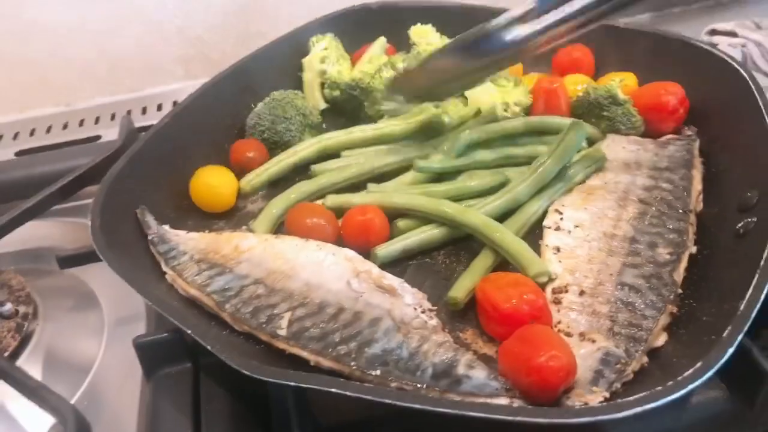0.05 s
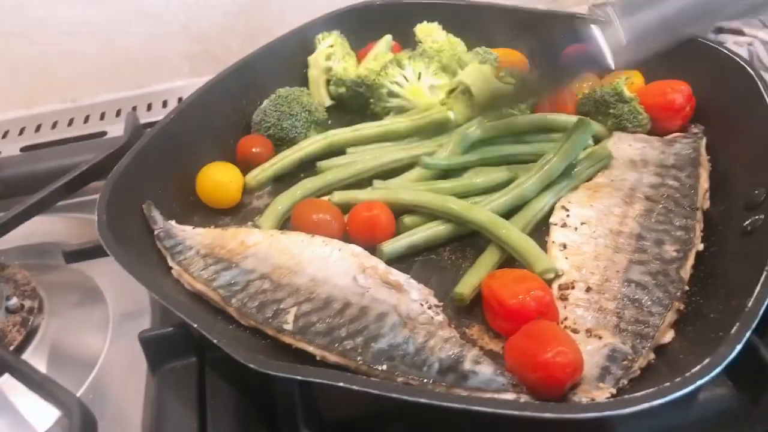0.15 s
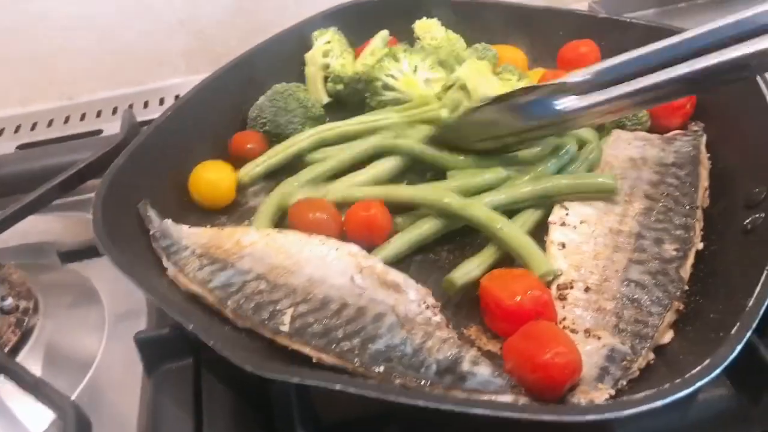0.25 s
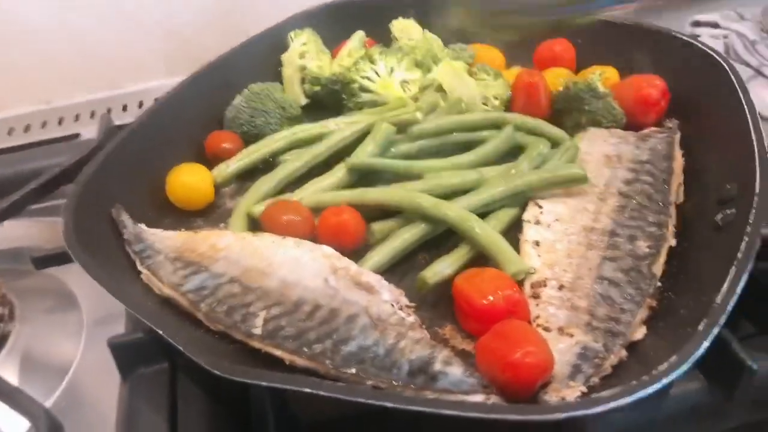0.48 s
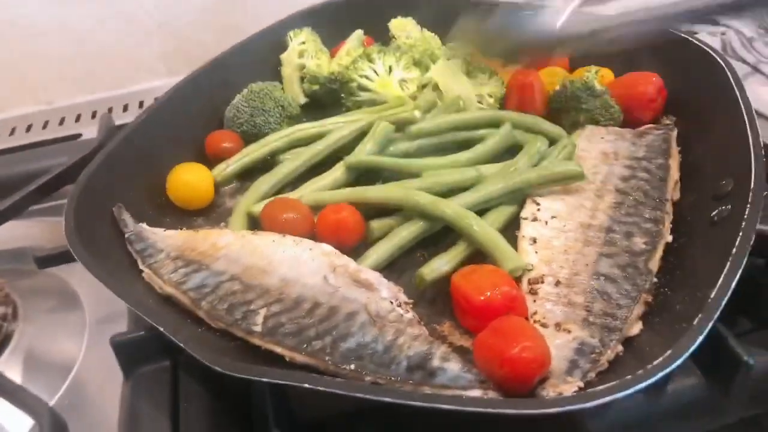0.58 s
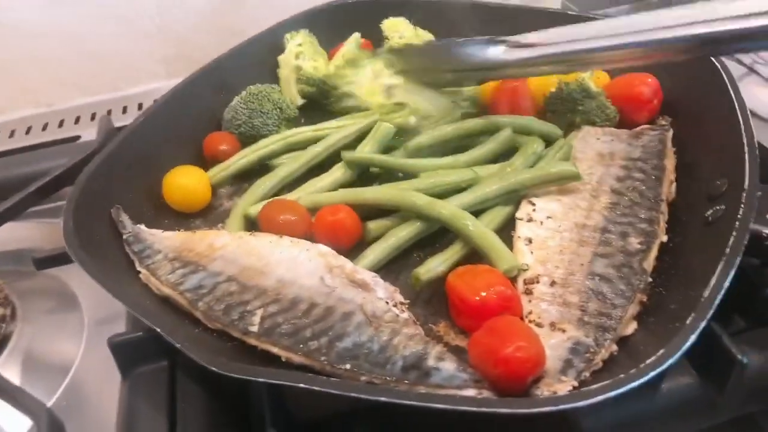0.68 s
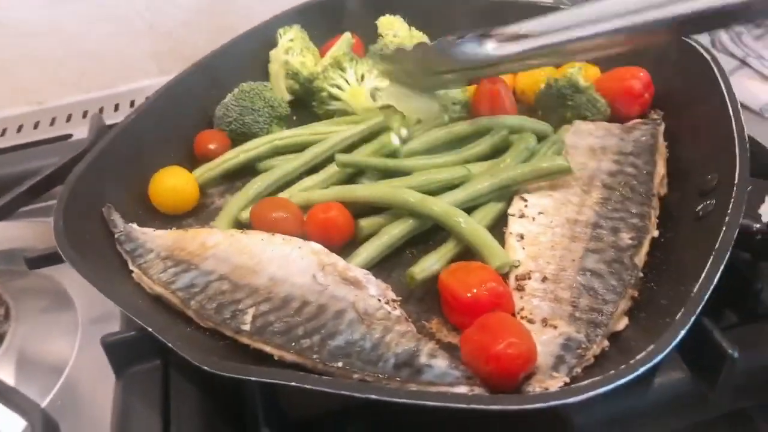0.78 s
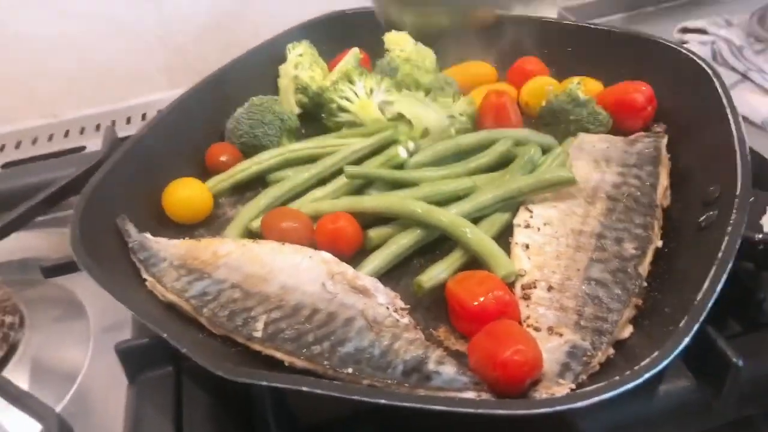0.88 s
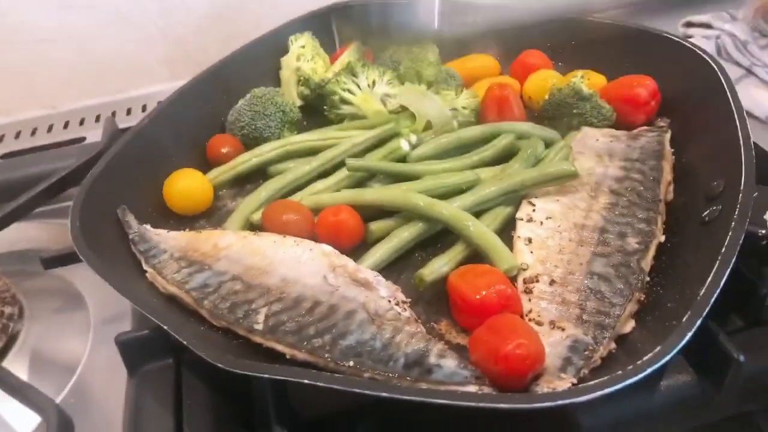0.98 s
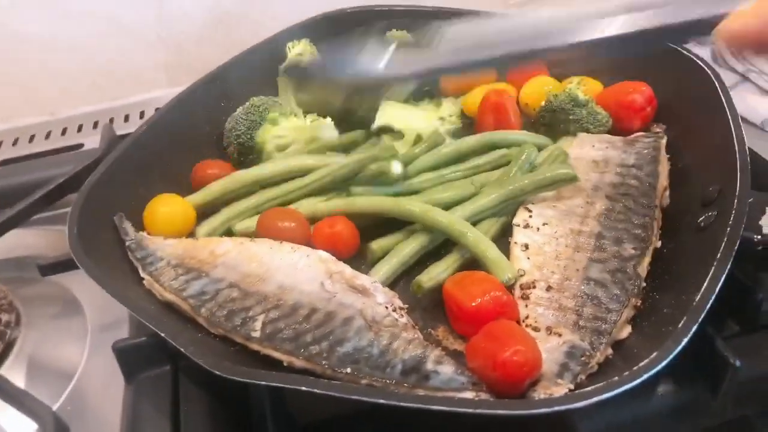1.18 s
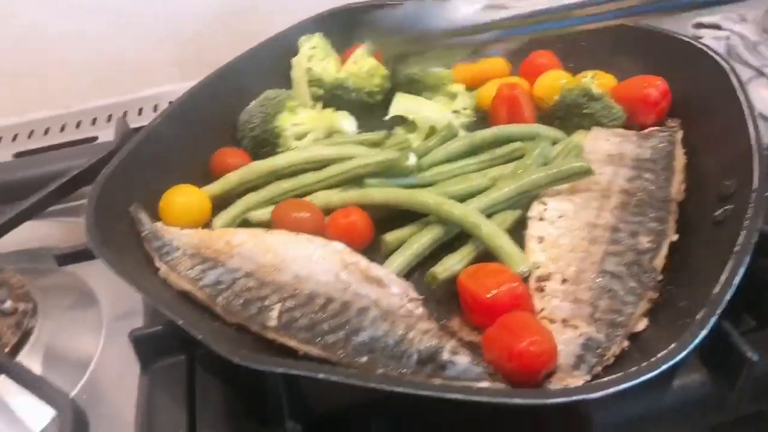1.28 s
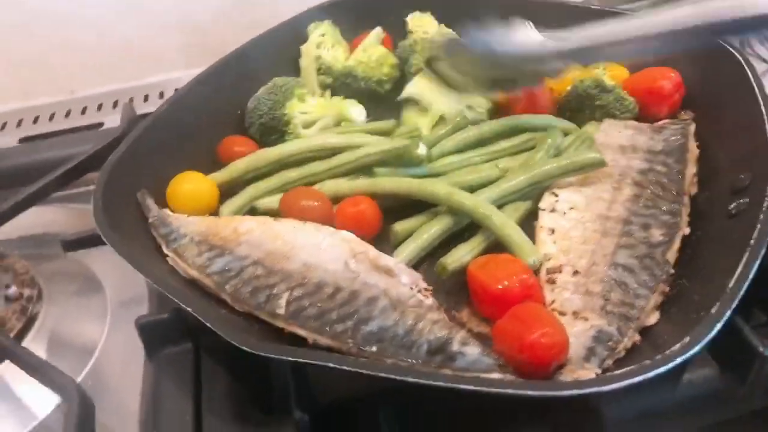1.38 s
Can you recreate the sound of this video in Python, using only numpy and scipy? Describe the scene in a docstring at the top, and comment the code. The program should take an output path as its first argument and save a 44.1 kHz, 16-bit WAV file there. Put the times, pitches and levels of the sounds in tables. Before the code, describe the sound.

One sharp clack of steel tongs on a pan, with food sizzling softly underneath.

```python
"""Tongs on a frying pan

Fat sizzles softly over a gas flame while the pan rocks on its grate with dull thuds.
Steel tongs graze, then clack hard on the coated pan: the impacts excite its damped modes,
and the kitchen reverberates. Small scrapes and spits tick; at the end the tongs' arms clink."""
import sys
import numpy as np
from scipy import signal
from scipy.fft import rfft, irfft
from scipy.io import wavfile
from scipy.ndimage import uniform_filter1d

SR = 44100
rng = np.random.default_rng(int(sys.argv[2]) if len(sys.argv) > 2 else 0)


def wav_record(signal):
    """Record a signal, one row per channel, as 16-bit PCM in the file named by sys.argv[1]."""
    frames = np.transpose(np.atleast_2d(signal))
    bounded = np.clip(frames, -1, 1)
    # unit amplitude maps onto the largest positive 16-bit level
    quanta = np.round(bounded * 32767).astype(np.int16)
    wavfile.write(sys.argv[1], SR, quanta)


N = 63945
T = np.arange(N) / SR
BANDS_HZ = 30 * 2 ** np.arange(0, 9.6, .5)  # half-octave centres


def undb(db):
    """Amplitude ratio of a level in decibels."""
    return 10 ** (np.asarray(db) / 20)


def unit(x):
    """Normalisation to an rms of 1."""
    return x / np.sqrt(np.mean(x ** 2))


def value_at(table, hz):
    """Interpolation of (frequency, value) rows on a logarithmic frequency axis."""
    freqs, values = np.array(table).T
    return np.interp(np.log(hz), np.log(freqs), values)


def convolve(drive, response):
    """A linear system's output: the drive convolved with its impulse response."""
    return signal.fftconvolve(drive, response)[:N]


def noise_band(hz, octaves):
    """White noise through a cosine passband that reaches zero `octaves` either side of hz."""
    freqs = np.maximum(np.fft.rfftfreq(N, 1 / SR), 1)
    shape = np.cos(np.pi / 2 * np.clip(np.log2(freqs / hz) / octaves, -1, 1))
    return irfft(rfft(rng.standard_normal(N)) * shape, N)


def flicker(rate_hz):
    """Random modulation: held random steps, smoothed twice, with an rms of 1."""
    hold = int(SR / rate_hz)
    steps = np.repeat(rng.standard_normal(N // hold + 1), hold)
    return unit(uniform_filter1d(uniform_filter1d(steps, hold), hold)[:N])


def burst(start, db, decay_ms):
    """Envelope with a sudden onset and exponential decay."""
    return undb(db) * (T > start) * np.exp(-np.maximum(T - start, 0) / (decay_ms / 1000))


def modal_response(modes):
    """Modal superposition: an impulse response of damped sines with alternating sign."""
    return sum((-1) ** k * undb(db - 60 * T / t60) * np.sin(2 * np.pi * hz * T)
               for k, (hz, db, t60) in enumerate(modes))


def contact_force(impacts):
    """Half-sine pulses, at least two samples long: level sets the impulse, longer contact is duller."""
    force = np.zeros(N)
    for start, db, contact_ms in impacts:
        progress = (T - start) / max(contact_ms / 1000, 2 / SR)
        pulse = np.where((progress > 0) & (progress < 1), np.sin(np.pi * progress), 0)
        force += undb(db) * pulse / pulse.sum()
    return force


def sizzle():
    """Flame and fat give modulated noise; spatters are shot noise lifted by a pan resonance."""
    # hiss spectrum (frequency [Hz], relative spectral level [dB])
    spectrum = [(18, -38), (30, 1), (75, -2.5), (252, -5), (311, -6.5), (569, -10), (822, -4), (1630, -9.5),
                (4080, -5), (6380, -10.5), (14800, -15.5), (16000, -12.5)]
    # lift of the bands above 7 kHz (time [s], gain [dB])
    treble_lift = [(0, 2), (.3, 3.5), (.6, 1.5), (1, 1.5), (1.43, 2.5)]
    # swell of the whole sizzle (time [s], relative level [dB])
    swell = [(0, -50), (.2, -52.5), (.5, -50.5), (.75, -51), (1.1, -51.5), (1.43, -54)]
    flicker_db, spatters_per_s = 1.45, 650
    common_flicker = .7 * flicker(29.64)
    treble_db = np.interp(T, *np.array(treble_lift).T)
    hiss = 0
    for hz in BANDS_HZ:
        band_db = value_at(spectrum, hz) + (hz > 7000) * treble_db
        band_db = band_db + flicker_db * (flicker(19.84) + common_flicker)
        hiss += undb(band_db) * noise_band(hz, 0.53)
    pops = (rng.random(N) < spatters_per_s / SR) * undb(4 * rng.exponential(size=N))
    spatter = convolve(pops, modal_response([(4400, 0, 0.0046)]))
    envelope = undb(np.interp(T, *np.array(swell).T) + 2.5)
    return (unit(hiss) + undb(-13) * unit(spatter)) * envelope


def pan_thuds():
    """Damped oscillation: each rock on the grate is an unsteady tone with a broad rumble around it."""
    # rocks of the pan (time [s], level [dB], frequency [Hz], T60 [s])
    rocks = [(.003, -35, 162, 0.054), (.008, -47.5, 98, 0.18), (0.011, -46, 412, 0.2),
             (0.051, -46, 93.5, 0.14), (.11, -69, 107, 0.14), (0.245, -39.5, 161, 0.162),
             (0.246, -34.5, 80.3, 0.425), (0.292, -44.5, 69.5, 0.16), (0.3, -28.5, 1087, 0.067),
             (0.327, -38, 411, 0.25), (0.371, -39.5, 96, 0.2), (0.441, -52, 87, 0.1),
             (.571, -48, 675, 0.04), (.58, -50, 314, 0.11), (0.587, -46, 60.7, 0.37),
             (0.583, -42, 169, 0.26), (.634, -43.5, 665, 0.042), (0.646, -32.5, 153.4, 0.05),
             (0.648, -45, 290, 0.23), (0.67, -31.5, 79.7, 0.13), (.7, -49.5, 172, 0.45),
             (0.719, -45, 84, 0.42), (0.756, -43.5, 69, 0.14), (.797, -49, 88.7, 0.3),
             (0.761, -57.5, 287, 0.45), (.83, -56, 295.5, 0.32), (.95, -58.5, 305, 1),
             (.845, -55.5, 82, 0.52), (1.078, -45.5, 84.4, 0.32), (1.084, -51, 183, 0.37),
             (1.131, -47, 115.7, 0.34), (1.161, -34, 167, 0.05), (1.163, -54.5, 310.5, 0.29),
             (1.22, -45, 109.5, 0.19), (1.359, -47.5, 77, 0.11), (1.44, -45.5, 144, 0.12)]
    roughness, rumble_db, rise_cycles = .4, -8, 0.74
    out = 0
    for start, db, hz, t60 in rocks:
        age = np.maximum(T - start, 0)
        tone = np.sin(2 * np.pi * hz * age) * (1 + roughness * flicker(39.83))
        rumble = undb(rumble_db) * unit(noise_band(hz, 1))
        rise = 1 - np.exp(-age * hz / rise_cycles)
        out += undb(db - 60 * age / t60) * rise * (tone + rumble)
    return out


def ticks():
    """Scrapes and spits are band-limited transients: decaying noise with a sine for a hint of pitch."""
    # scrapes and spits (time [s], level [dB], decay time constant [ms], centre frequency [Hz])
    transients = [(.07, -50, 11, 7400), (0.109, -53, 47, 8030), (0.5762, -49, 9.8, 5620),
                  (0.579, -49, 11, 8460), (0.576, -52, 7.4, 2385), (0.6422, -47.5, 6.9, 4360),
                  (0.643, -51.5, 8, 8600), (0.896, -56, 5, 5280), (0.9122, -52, 4.2, 3080),
                  (1.044, -51, 4.3, 4730), (1.102, -55, 14, 1390), (1.114, -49, 5, 3200),
                  (1.117, -67, 5.8, 13100), (1.199, -63, 2.9, 3480), (1.253, -54, 32, 9130)]
    out = 0
    for start, db, decay_ms, hz in transients:
        tone = undb(-1) * np.sin(2 * np.pi * hz * T)
        out += burst(start, db, decay_ms) * (unit(noise_band(hz, 0.68)) + tone)
    return out


def pan_clack():
    """Impacts excite modes and a noisy crack; returns the direct sound and the drive of the room."""
    # tongs striking the pan (time [s], impulse level [dB], contact time [ms])
    impacts = [(.2205, -39.5, 0.28), (.2325, -26, 0.39), (.2364, -12.5, 0.096), (.2386, -21.5, 0.026),
               (.3, -27.5, 0.44), (.335, -32, 0.52)]
    # quickly damped modes of the blow (frequency [Hz], level [dB], T60 [s])
    blow_modes = [(684.6, 0.5, 0.074), (1082, -10, 0.069), (1486, -3, 0.033), (1880, -6.5, 0.017),
                  (2305, -8, 0.021), (2516, -9.5, 0.092), (3164, 1, 0.02), (3890, -6.5, 0.025),
                  (4494, -3.5, 0.038), (5300, -3, 0.024), (6610, -5.5, 0.022), (7080, -9, 0.059),
                  (8000, 0.5, 0.01), (15000, -6, 0.036)]
    # lasting modes of the pan (frequency [Hz], relative level [dB], T60 [s])
    pan_modes = [(409, -15, 0.58), (607.5, 4.5, 0.1), (730, -34, 0.28), (764.7, 0.5, 0.41),
                 (833, -10.5, 0.46), (892, -14, 0.38), (1028, -32, .35), (1182.6, -5, .3), (1120, -12, 0.9),
                 (1402, 0, 0.17)]
    # spectrum of the crack (frequency [Hz], relative level [dB])
    crack_spectrum = [(350, -54), (650, 2.5), (1500, -10), (3000, 2.5), (5000, 2.5), (8000, -12.5),
                      (10000, -4.5), (13000, -1), (15500, -34.5)]
    pan_db, crack_db, crack_t60_s, crack_rise_s = -13.5, -8, 0.14, 0.0005
    noise = unit(sum(undb(value_at(crack_spectrum, hz)) * noise_band(hz, 1) for hz in BANDS_HZ[6:]))
    crack = noise * undb(crack_db - 60 * T / crack_t60_s) * (1 - np.exp(-T / crack_rise_s))
    force = contact_force(impacts)
    ringing = convolve(force, modal_response(blow_modes) + undb(pan_db) * modal_response(pan_modes))
    direct = ringing + convolve(force, crack)
    room_drive = undb(-18) * ringing + undb(23.5) * force
    return direct, room_drive


def tongs_clink():
    """Free vibration of the steel tongs after arm strikes arm, with a short rattle of noise."""
    # arm striking arm (time [s], impulse level [dB], contact time [ms])
    impacts = [(1.4392, -51, .04), (1.4415, -40, .04)]
    # modes of the tongs (frequency [Hz], level [dB], T60 [s])
    tong_modes = [(1125, -9, .04), (2160, -3, .06), (2800, -8, .04), (4270, -6, .04), (7840, 0, .04),
                  (8310, -2, .05), (9580, -5, .04), (12820, 4, .15), (15570, -2, .04)]
    rattle = burst(start=1.439, db=-38, decay_ms=14) * rng.standard_normal(N)
    return rattle + convolve(contact_force(impacts), modal_response(tong_modes))


def kitchen_reverb(drive):
    """Reverberation: a diffuse field builds after the first reflection and lasts longest near 3 kHz."""
    # reverberation time (frequency [Hz], T60 [s])
    decay_times = [(100, 0.45), (400, 0.43), (1100, .45), (3000, 0.97), (7000, 0.31), (14000, 0.59)]
    # initial spectrum of the tail (frequency [Hz], relative level [dB])
    tail_spectrum = [(100, 4), (400, 2.5), (750, 12), (1500, -1), (3000, -6), (5000, 1.5), (8000, -10.5),
                     (14000, -19.5)]
    room_db, delay_s, build_s = -7, 0.0087, 0.0017
    age = np.maximum(T - delay_s, 0)
    tail = 0
    for hz in BANDS_HZ:
        band_db = value_at(tail_spectrum, hz) - 60 * age / value_at(decay_times, hz)
        tail += undb(band_db) * noise_band(hz, 0.61)
    tail *= 1 - np.exp(-age / build_s)
    return undb(room_db) * convolve(drive, tail / np.sqrt(np.sum(tail ** 2)))


def scene():
    """Superposition of the direct impacts, their reverberation and the sizzle, in one channel."""
    clack, clack_to_room = pan_clack()
    small_sounds = ticks() + tongs_clink()
    thuds = pan_thuds()
    reverberation = kitchen_reverb(clack_to_room + small_sounds + undb(-7) * thuds)
    return (clack + small_sounds + thuds + reverberation + sizzle())[None]


def record(dry):
    """Band limiting: a high-pass drops the deepest bass and a steep low-pass cuts the top."""
    low_hz, top_hz = 55, 15700
    high_pass = signal.butter(4, low_hz, btype="high", fs=SR, output="sos")
    low_pass = signal.ellip(10, .2, 70, top_hz, fs=SR, output="sos")
    return signal.sosfilt(low_pass, signal.sosfilt(high_pass, dry))


dry = scene()
out = record(dry)
wav_record(out)
```